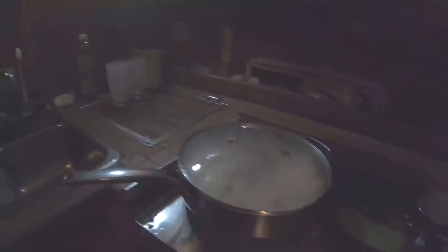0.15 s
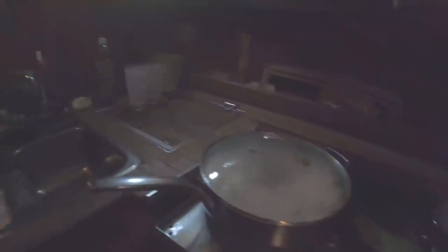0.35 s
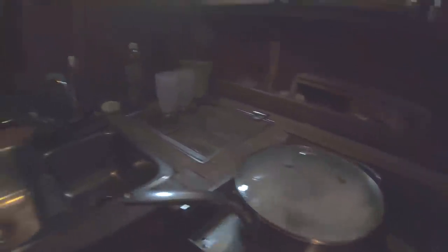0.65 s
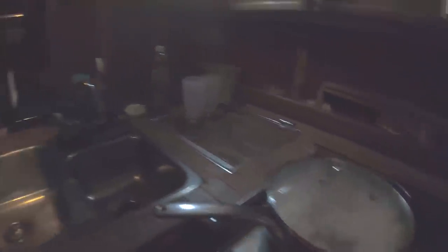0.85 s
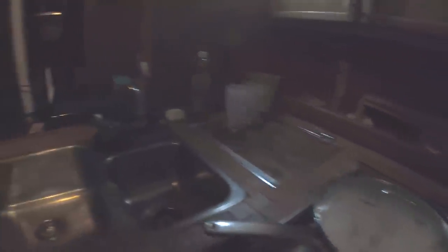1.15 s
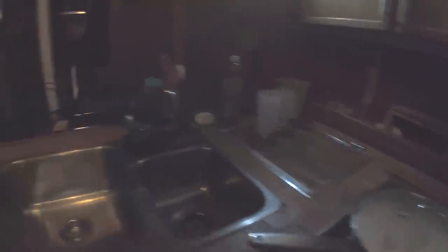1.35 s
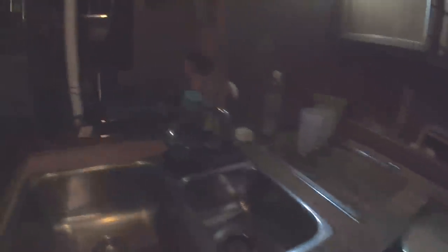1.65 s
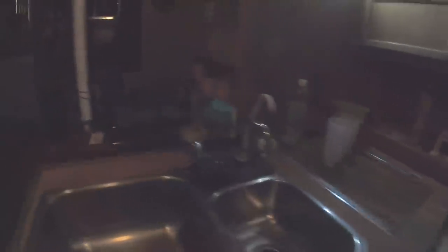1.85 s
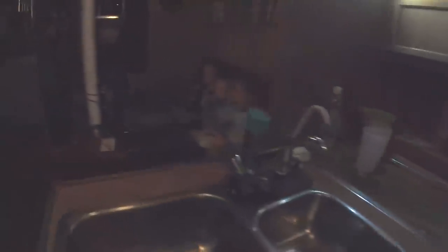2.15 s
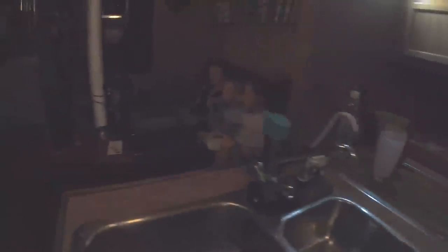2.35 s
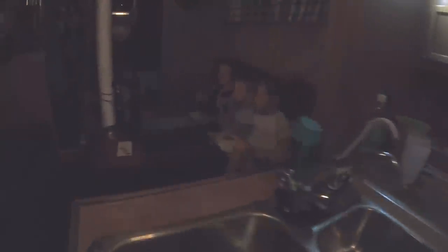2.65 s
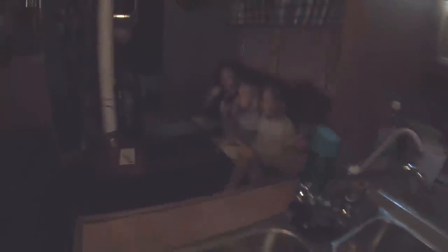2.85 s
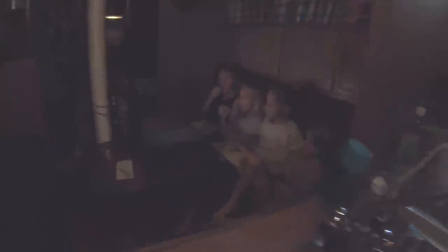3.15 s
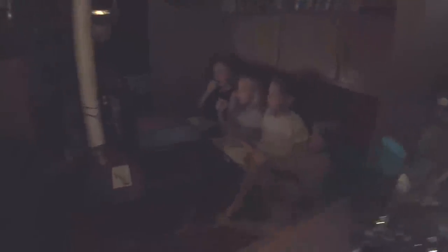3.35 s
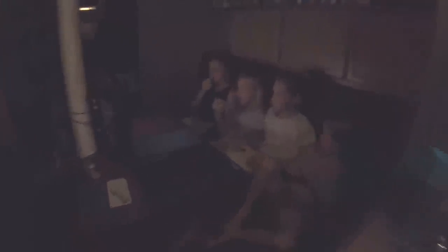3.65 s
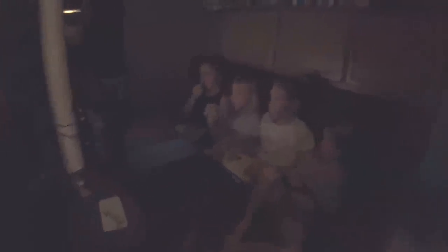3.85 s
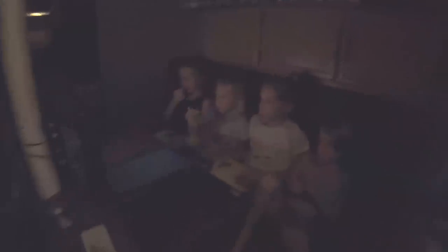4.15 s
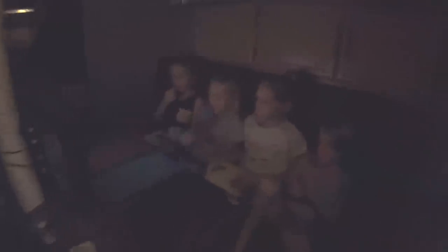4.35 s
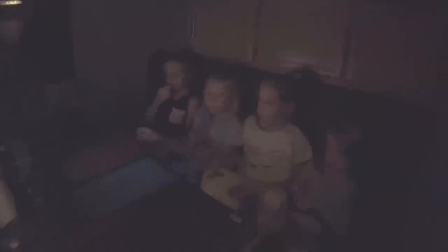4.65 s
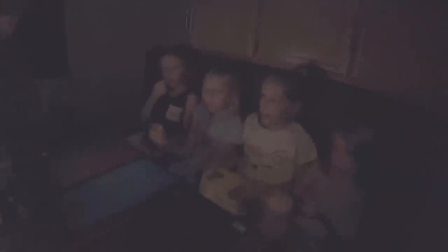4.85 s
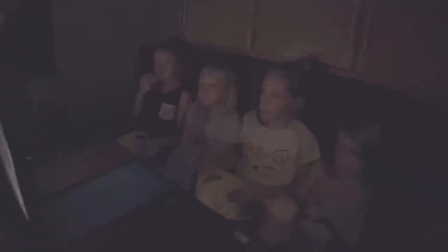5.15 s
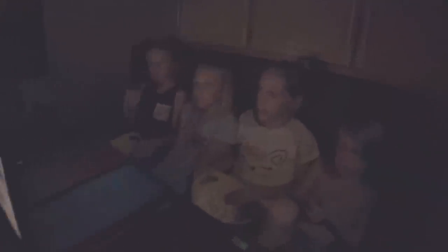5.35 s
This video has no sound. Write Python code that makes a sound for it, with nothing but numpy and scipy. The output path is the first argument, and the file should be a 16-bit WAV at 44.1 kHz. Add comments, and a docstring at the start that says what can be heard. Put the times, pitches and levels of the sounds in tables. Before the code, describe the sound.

Sharp cracks and metallic knocks of popping corn under a steel lid, low puffs beneath, soft oil hiss, and escaping steam near the end.

```python
"""Hot oil sizzles faintly, and almost at once popcorn starts to pop in a lidded steel pan in a boat galley.
Each kernel cracks its hull, knocks the pan, rings the lid and lets out a low puff of steam.
Flying kernels tap the metal, shoved neighbours tick, and near the end steam hisses out past the lid.
Blows are short noise bursts and struck tones shaped by the pan's resonances; oil, steam and burner
are coloured noise. Small wooden walls add a short echo."""
import sys
import numpy as np
from scipy import signal
from scipy.io import wavfile

SR = 44100
rng = np.random.default_rng(int(sys.argv[2]) if len(sys.argv) > 2 else 0)


def output_pcm(signal):
    """Save a mono or channel-first signal as 16-bit PCM at the path in sys.argv[1].

    Samples are clipped to [-1, 1] before scaling.
    """
    pcm = np.clip(np.atleast_2d(signal).T, -1, 1) * 32767
    wavfile.write(sys.argv[1], SR, np.round(pcm).astype(np.int16))


N = 242764
TIME = np.arange(N) / SR
BURST_TIME = TIME[:4096]  # time inside one short blow
BAND_EDGES_HZ = 22 * 2 ** np.arange(0, 9.6, .5)  # half an octave apart

# Blow levels are those of the first 11 ms, before the resonances below colour them.
# bursting kernels: (time [s], steam thump [dB], thump pitch [Hz], pan knock [dB], knock pitch [Hz],
# lid ring [dB], hull crack [dB], top of the crack [Hz])
POPS = [(0.1207, -36, 178, -37.5, 1310, -39, -37.5, 7700), (0.155, -37.5, 240, -42, 970, -52, -35.5, 10300),
        (0.2384, -34.5, 173, -46, 790, -40, -35.5, 11100),
        (0.3902, -42, 135, -46.5, 1220, -44.5, -34, 7100), (0.4722, -39.5, 155, -56, 620, -44, -38, 9500),
        (0.584, -41, 133, -47, 670, -40, -45, 10700), (0.591, -45, 129, -49, 970, -47, -29, 11400),
        (0.7326, -47, 167, -46.5, 774, -44, -40.5, 6600), (0.7433, -32, 175, -40, 1530, -36.5, -33.5, 7900),
        (0.7612, -38, 145, -57, 974, -41, -39.5, 8800), (0.788, -39.5, 185, -41.5, 1540, -40.5, -34, 11400),
        (1.0986, -45.5, 201, -49, 880, -54, -31.5, 10100),
        (1.3433, -37.5, 157, -37, 823, -37, -37.5, 12200), (1.44, -39.5, 183, -35.5, 762, -43, -45.5, 7400),
        (1.454, -43, 208, -51, 820, -39, -48, 6600), (1.6236, -31, 250, -39.5, 930, -44.5, -33.5, 5900),
        (1.9013, -39, 127, -45.5, 1040, -39, -37, 4800), (1.9206, -37.5, 182, -47.5, 1030, -44, -47, 9000),
        (2.268, -40.5, 139, -48, 1020, -41.5, -35, 5900),
        (2.2917, -35.5, 134, -45.5, 784, -40, -34.5, 8160), (2.4247, -40, 205, -48, 880, -43, -43, 6600),
        (2.442, -33, 170, -40, 1440, -38, -31.5, 11000), (2.6062, -37, 176, -42.5, 1370, -41, -45.5, 8500),
        (2.6554, -32.5, 179, -37.5, 1220, -43, -34, 6300), (2.6621, -48, 152, -44.5, 686, -41, -31, 5600),
        (2.7761, -37.5, 187, -43, 979, -40.5, -36, 13400), (2.7989, -40, 171, -50, 900, -50, -37, 8500),
        (2.8456, -32.5, 210, -41.5, 860, -38.5, -35, 5130), (3.01, -36.5, 163, -39.5, 990, -35, -36, 10300),
        (3.0693, -52, 135, -49, 690, -46, -41.5, 6500), (3.077, -34.5, 139, -46, 1000, -43, -40, 8500),
        (3.248, -32.5, 194, -44.5, 977, -41.5, -35, 9100), (3.434, -37, 201, -42, 880, -40, -38.5, 10000),
        (3.5262, -37, 140, -49, 1010, -44, -36, 12400), (3.561, -31.5, 143, -38, 930, -52, -42, 8200),
        (3.691, -41, 155, -43.5, 890, -44, -38, 6100), (3.8012, -38.5, 170, -43.5, 1420, -42, -35, 13000),
        (3.8455, -36.5, 166, -44.5, 710, -46, -28.5, 4700),
        (4.0859, -45, 161, -42, 840, -44.5, -40.5, 9100),
        (4.146, -32.5, 166, -36.5, 1300, -40.5, -42, 10700),
        (4.1987, -44, 194, -49, 795, -38, -30.5, 15400), (4.2108, -32, 200, -34, 875, -32.5, -32, 11400),
        (4.5534, -37.5, 177, -40, 960, -43, -40, 5700), (4.6392, -43, 213, -51, 865, -46.5, -31, 11500),
        (4.911, -40, 180, -46.5, 735, -45.5, -46, 9000),
        (5.0651, -32.5, 159, -39.5, 710, -36.5, -29, 10200),
        (5.0916, -35.5, 138, -48, 1400, -38, -36.5, 4800), (5.176, -37.5, 145, -52, 1030, -40.5, -42, 7850),
        (5.3262, -31, 202, -40, 870, -39.5, -32, 6140), (5.3395, -43, 159, -49, 720, -40, -32.5, 8500),
        (5.3779, -31.5, 153, -43, 780, -39, -32.5, 4000), (5.402, -43.5, 160, -44, 840, -39.5, -26, 7500)]
# kernels and bits of hull thrown against lid and wall: (time [s], level [dB], centre [Hz])
TAPS = [(0.175, -45, 2230), (0.6363, -44.5, 2120), (0.669, -48.5, 1980), (0.8482, -39.5, 3800),
        (0.939, -50.5, 2580), (1.378, -51, 2200), (1.5075, -39, 2310), (1.598, -47, 4000),
        (1.6402, -42.5, 2310), (1.66, -44.5, 3780), (1.696, -46, 4550), (1.782, -47, 4470),
        (1.9445, -38, 2330), (1.981, -49.5, 2510), (1.988, -48, 2600), (2.154, -47, 4560),
        (2.327, -51, 1500), (2.345, -46, 1800), (2.385, -51, 2380), (2.4923, -43, 1960),
        (2.525, -47.5, 3840), (2.71, -52, 8040), (2.7507, -44, 3400), (2.8657, -39, 2150),
        (2.9123, -42, 3500), (2.9193, -38.5, 5030), (3.0285, -41.5, 1980), (3.092, -45.5, 2370),
        (3.274, -50, 1510), (3.5777, -41.5, 2000), (3.601, -46, 2230), (3.829, -40.5, 1960),
        (3.916, -48.5, 2340), (4.194, -38, 8000), (4.252, -45, 3460), (4.302, -50.5, 3450),
        (4.355, -54.5, 2940), (4.475, -50.5, 10000), (4.5958, -46.5, 1520), (5.024, -50, 3030),
        (5.031, -38.5, 4250), (5.443, -45, 5200)]
# resonances of pan and lid: (frequency [Hz], width [Hz], lift [dB])
PAN_MODES = [(428, 32, 13), (720, 195, 6.5), (890, 50, 2.5), (994, 33, 7), (1208, 46, 4), (1447, 42, 6.5),
             (1720, 97, 2.5), (1965, 58, 7.5), (2330, 146, 2.5), (2947, 20, 6.5), (3430, 43, 8.5),
             (4550, 134, 4.5), (4920, 160, 1.5), (5440, 62, 7), (7450, 190, 3), (8820, 320, 3.5)]
# resonances of the gap at the lid's rim: (frequency [Hz], width [Hz], lift [dB])
RIM_MODES = [(4800, 180, 2.5), (12300, 300, 2)]
# the microphone's dips and lift: (frequency [Hz], width [Hz], change [dB])
MIC_COLOUR = [(11000, 4300, -6.5), (13900, 810, 1.5), (15500, 1700, -5)]
# strength of the cabin's echo: (frequency [Hz], level against the direct sound [dB])
CABIN_LEVEL = [(50, 11.5), (95, -6), (300, -3), (800, -8.5), (2000, -13), (5000, -13), (14000, -9.5)]
# how long the echo takes to fall by 60 dB: (frequency [Hz], fall time [s])
CABIN_FALL = [(60, 0.067), (125, 0.28), (400, 0.35), (2000, 0.27), (6000, 0.083), (14000, 0.12)]
# loudness of the hot oil: (time [s], level [dB])
SIZZLE_LEVEL = [(0, -50.5), (.8, -53.5), (1.1, -55), (2.2, -52.5), (2.7, -48.5), (3.3, -52), (4.1, -55),
                (4.9, -56), (5.5, -52)]
# loudness of the escaping steam, before its flutter: (time [s], level [dB])
STEAM_LEVEL = [(0, -63.5), (4.97, -69), (5.12, -57), (5.23, -49), (5.35, -48), (5.5, -48)]
# loudness of the simmer murmuring in the pan's hollow: (time [s], level [dB])
SIMMER_LEVEL = [(0, -60.5), (.7, -53), (1.1, -70.5), (2.7, -57), (3.4, -61), (5.5, -66)]
# colour of the oil's hiss: (frequency [Hz], relative level [dB per Hz])
SIZZLE_COLOUR = [(100, 16.5), (400, 8), (900, 4), (2000, 2.5), (4500, -8.5), (8500, -19), (11000, -11),
                 (16000, -21)]
# colour of the steam's hiss: (frequency [Hz], relative level [dB per Hz])
STEAM_COLOUR = [(300, -28), (1500, -14), (5500, -10), (8500, -8), (11000, -15), (16000, -20)]
# colour of the burner's low rumble: (frequency [Hz], relative level [dB per Hz])
BURNER_COLOUR = [(25, -0.5), (80, -12.5), (120, -30), (200, -16.5), (400, -42.5)]
# the microphone's offset settling after switching on, in two parts: (size, time constant [s])
SETTLING = [(-.36, 1), (0.141, 0.43)]


def from_db(db):
    """Turn decibels into a gain."""
    return 10 ** (np.asarray(db) / 20)


def rms_one(x):
    """Scale a sound to an rms (average strength) of 1."""
    return x / np.sqrt(np.mean(x ** 2) + 1e-20)


def even(rows):
    """Scale each blow to rms 1."""
    return rows / np.std(rows, axis=-1, keepdims=True)


def at_hz(points, hz):
    """Read a curve at a frequency, on a log-frequency axis."""
    f, value = np.transpose(points)
    return np.interp(np.log(hz), np.log(f), value)


def gain_over_time(points):
    """Turn a (time, level) table into a smoothly joined gain."""
    return from_db(np.interp(TIME, *np.transpose(points)))


def butter(x, hz, kind, order=2):
    """Butterworth filter that looks only at the past."""
    sos = signal.butter(order, np.clip(hz, 10, .45 * SR), kind, fs=SR, output="sos")
    return signal.sosfilt(sos, x + 1e-18)


def resonance(x, hz, width_hz):
    """Let one pitch ring: a two-pole resonance with gain 1 at its top."""
    r = np.exp(-np.pi * width_hz / SR)
    feed = np.array([1, 0, -1]) * (1 - r * r) / 2
    feedback = [1, -2 * r * np.cos(2 * np.pi * hz / SR), r * r]
    return signal.lfilter(feed, feedback, x + 1e-18)


def coloured(x, peaks):
    """Pass a sound through a chain of lifts or dips."""
    for hz, width_hz, db in peaks:
        x = x + (from_db(db) - 1) * resonance(x, hz, width_hz)
    return x


def noise_bands(size):
    """Half-octave bands of white noise with their centres; neighbours are unrelated."""
    white = rng.standard_normal((2, size))
    bands = []
    for k, (lo, hi) in enumerate(zip(BAND_EDGES_HZ, BAND_EDGES_HZ[1:])):
        bands.append((np.sqrt(lo * hi), butter(white[k % 2], [lo, hi], "band")))
    return bands


def hiss(colour):
    """Steady noise of a given colour, rms 1."""
    return rms_one(sum(from_db(at_hz(colour, hz)) * band for hz, band in noise_bands(N)))


def droplets(per_s=450, spread_db=3):
    """Random tiny bursts of uneven size, rms 1."""
    sizes = from_db(spread_db * np.minimum(rng.exponential(1, N), 4)) * rng.choice([-1, 1], N)
    return rms_one(sizes * (rng.random(N) < per_s / SR))


def first_arrival(count, t60):
    """One row per blow: the sharp direct sound, ahead of the bounces inside the pan."""
    return rng.standard_normal((count, len(BURST_TIME))) * from_db(-60 * BURST_TIME / t60)


def clatter(count, t60, hold, ring=1.33, ring_width_hz=110):
    """One row per blow: sound bounces inside the pan and dies fast; each spot favours a few modes."""
    # full strength for hold seconds, then a fall of 60 dB in t60 seconds
    fade = from_db(-60 * np.maximum(BURST_TIME - hold, 0) / t60)
    mode_hz = 700 * 2 ** rng.uniform(0, 4, (count, 7))
    blows = rng.standard_normal((count, len(BURST_TIME))) * fade
    rows = []
    for blow, spot in zip(blows, mode_hz):
        ringing = sum(resonance(blow, hz, ring_width_hz) for hz in spot)
        rows.append(blow + ring * ringing)
    return np.array(rows)


def mode(hz, t60, lag=0):
    """One row per blow: a struck mode of the metal, a tone dying away."""
    t = np.maximum(BURST_TIME - lag, 0)
    return np.sin(2 * np.pi * np.outer(hz, t)) * from_db(-60 * t / t60)


def snap(lag):
    """The single pressure spike of a hull giving way, lag seconds in, rms 1."""
    return even(1.0 * (np.arange(len(BURST_TIME)) == int(abs(lag) * SR)))


def played(times, levels_db, bursts, span=0.011, rise=0.00015):
    """Lay bursts out in time, each with a quick rise and at its rms level over its first span seconds."""
    out = np.zeros(N + len(BURST_TIME))
    n = int(span * SR)
    for s, db, burst in zip(times, levels_db, bursts):
        at = int(np.clip(s * SR, 0, N))
        burst = burst * (1 - np.exp(-BURST_TIME / rise))
        out[at:at + len(burst)] += from_db(db) * burst / np.sqrt(np.mean(burst[:n] ** 2))
    return out[:N]


def cabin(x, build_up=0.0045, count=4):
    """Close wooden walls: a dense echo, mostly shorter in the treble; it changes as the microphone turns."""
    t = TIME[:SR * 2 // 3]
    out = 0
    for place in range(count):
        echo = 0
        for hz, band in noise_bands(len(t)):
            fade = from_db(-60 * t / at_hz(CABIN_FALL, hz))
            tail = band * fade * (1 - np.exp(-(t / build_up) ** 2))
            echo = echo + from_db(at_hz(CABIN_LEVEL, hz)) * tail * band.std() / np.sqrt(np.sum(tail ** 2))
        # blend evenly from one echo pattern to the next
        share = np.maximum(1 - abs(TIME / TIME[-1] * (count - 1) - place), 0)
        out = out + signal.fftconvolve(x * np.sqrt(share), echo)[:N]
    return out


def nearly_mono(mid, treble_db=-23, bass_db=-32):
    """Nearly mono: a faint noise-like smear, stronger in the treble, sets left and right slightly apart."""
    smear = rng.standard_normal(128)
    unlike = from_db(treble_db) * np.diff(mid, prepend=0) + from_db(bass_db) * mid
    side = signal.fftconvolve(unlike, smear / np.linalg.norm(smear))[:N]
    return np.array([mid + side, mid - side])


def burner(level_db=-53.5):
    """The flame's steady low rumble, made of bass-heavy noise."""
    return from_db(level_db) * hiss(BURNER_COLOUR)


def simmer():
    """A murmur in the pan's hollow: noise in a narrow low band."""
    murmur = butter(rng.standard_normal(N), [290, 410], "band")
    return gain_over_time(SIMMER_LEVEL) * rms_one(murmur)


def sizzle():
    """Hot oil hisses: coloured noise that swells and sinks."""
    return gain_over_time(SIZZLE_LEVEL) * hiss(SIZZLE_COLOUR)


def spits(below_db=-11.5):
    """Droplets burst in the hot oil: a fine crackle that swells with the sizzle."""
    crackle = rms_one(butter(droplets(), [1200, 5500], "band"))
    return from_db(below_db) * gain_over_time(SIZZLE_LEVEL) * crackle


def steam(flutter_db=3.5, flutter_hz=110, wetness=0.38):
    """The jet sputters, fizzes as droplets pass through it, and half whistles in the gap at the lid's rim."""
    sputter = rms_one(butter(rng.standard_normal(N), flutter_hz, "low"))
    fizz = rms_one(butter(droplets(), [4000, 9000], "band"))
    jet = hiss(STEAM_COLOUR) + wetness * fizz
    gain = gain_over_time(STEAM_LEVEL) * from_db(flutter_db * sputter)
    return gain * rms_one(coloured(jet, PAN_MODES + RIM_MODES))


def taps(lid_hz=2170, lid_reach=0.09, ping=1.4, spread=1.4):
    """Light kernels hit the metal; those near the lid's main modes ping as well as tick."""
    s, db, centre_hz = np.transpose(TAPS)
    rows = clatter(len(s), t60=0.047, hold=0.00027)
    tones = mode(centre_hz, t60=0.023)
    blows = []
    for row, tone, hz in zip(rows, tones, centre_hz):
        tick = butter(row, [hz / spread, hz * spread], "band", order=1)
        tick = butter(tick, hz * 3, "low")
        nearness = np.exp(-(np.log(hz / lid_hz) / lid_reach) ** 2)  # 1 right at the lid's pitch
        blows.append(even(tick) + ping * nearness * even(tone))
    return played(s, db, blows)


def force_db():
    """How hard each kernel bursts: midway between its knock and its crack."""
    _, _, _, knock_db, _, _, crack_db, _ = np.transpose(POPS)
    return (knock_db + crack_db) / 2


def rattle(count=8, below_db=-14, first=0.009, last=0.17, fade_db_per_s=60, spread_db=1.5):
    """Each pop shoves its neighbours, which tumble against the pan in a dying run of small ticks."""
    s = np.repeat(np.array(POPS)[:, 0], count)
    delay = first * (last / first) ** rng.random(len(s))  # seconds, crowded towards the start
    db = np.repeat(force_db(), count) + below_db
    db = db + rng.normal(0, spread_db, len(s)) - fade_db_per_s * delay
    ticks = butter(clatter(len(s), t60=0.035, hold=0.00063), [1400, 5200], "band", order=1)
    return played(s + delay, db, ticks)


def tears(lead=0.0033, below_db=-15):
    """A hull begins to tear with a faint fizz, up to lead seconds before it bursts."""
    s, _, _, _, _, _, crack_db, _ = np.transpose(POPS)
    fizz = butter(first_arrival(len(s), t60=0.034), [2000, 10000], "band", order=1)
    return played(s - lead * rng.random(len(s)), crack_db + below_db, fizz)


def thumps(puff_width_hz=130, push_cycles=0.21, lag=0.0026, stray=0.6, low_cut_hz=75, main_db=3, boom_db=2):
    """Freed steam swings the air under the lid about once, and wakes the cabin's low modes."""
    s, thump_db, puff_hz = np.transpose(POPS)[:3]
    # a quicker burst is a shorter push and a higher thump
    pushes = np.exp(-(np.outer(puff_hz, BURST_TIME - lag) / push_cycles) ** 2)
    swings = []
    for push, hz in zip(pushes, puff_hz):
        swing = resonance(-push, hz, puff_width_hz)
        swings.append(resonance(swing, 0.18 * hz, 385))
    swings = butter(np.array(swings), low_cut_hz, "high", order=1)
    shudder = butter(clatter(len(s), t60=0.19, hold=0.011), [130, 480], "band")
    shudder = shudder * (1 - np.exp(-BURST_TIME / lag))
    puff = played(s, thump_db, even(swings) + stray * even(shudder))
    main_mode = from_db(main_db) * resonance(puff, 120, 8)
    boom = from_db(boom_db) * resonance(puff, 50.0, 20.6)
    return puff + main_mode + boom


def pops(knock_tone=0.84, knock_lag=0.00062, ring_snap=1.6, crack_snap=0.78, spike=0.47, spike_lag=0.001209):
    """The hull tears for a millisecond, then gives way in one spike; the kick knocks pan and lid."""
    s, _, _, knock_db, knock_hz, ring_db, crack_db, top_hz = np.transpose(POPS)
    # the knock on the pan's base, whose pitch depends on the spot
    knock = even(butter(clatter(len(s), t60=0.052, hold=0.00042), [520, 1500], "band"))
    knock = knock - knock_tone * even(mode(knock_hz, t60=0.034, lag=knock_lag))
    # the lid's ring
    ring = clatter(len(s), t60=0.063, hold=0.00099) + ring_snap * first_arrival(len(s), t60=0.011)
    ring = butter(even(ring) + spike * snap(spike_lag), [1450, 3400], "band", order=3)
    # the hull's bright crack
    crack = clatter(len(s), t60=0.037, hold=0.00084) + crack_snap * first_arrival(len(s), t60=0.021)
    crack = butter(even(crack) + spike * snap(spike_lag), 3600, "high", order=3)
    crack = [butter(row, hz, "low") for row, hz in zip(crack, top_hz)]
    knocks_and_rings = played(s, knock_db, knock) + played(s, ring_db, ring)
    return knocks_and_rings + played(s, crack_db, crack, rise=0.00034)


def scene(thump_echo_db=-2.0):
    """The pan in its cabin over the sizzle of the oil and the rumble of the burner."""
    background = burner() + simmer() + sizzle() + steam()
    pan = coloured(spits() + taps() + rattle() + tears() + pops(), PAN_MODES)
    thump = thumps()
    echo = cabin(pan + from_db(thump_echo_db) * thump)
    return nearly_mono(coloured(background + pan + thump + echo, MIC_COLOUR))


def record(dry, cutoff_hz=16000):
    """The top is cut steeply; a slow offset, far below hearing, settles to zero."""
    offset = sum(size * np.exp(-TIME / seconds) for size, seconds in SETTLING)
    steep_cut = signal.ellip(10, .1, 90, cutoff_hz, fs=SR, output="sos")
    return signal.sosfilt(steep_cut, dry) + offset


dry = scene()
out = record(dry)
output_pcm(out)
```